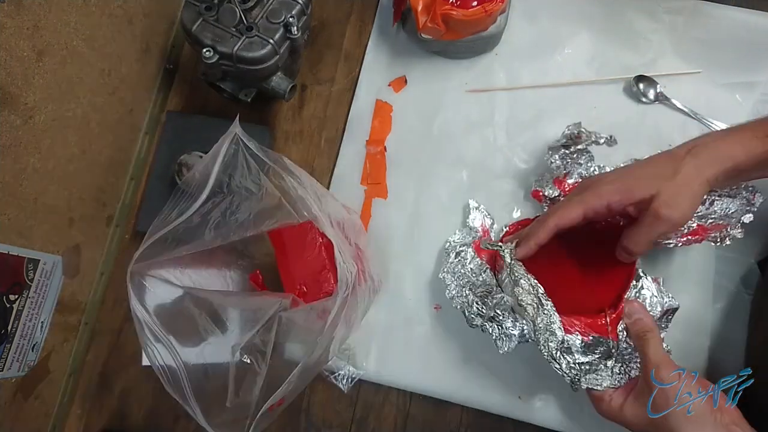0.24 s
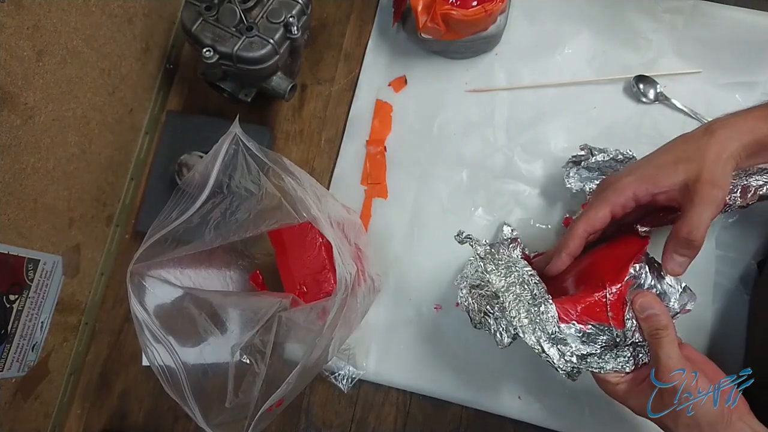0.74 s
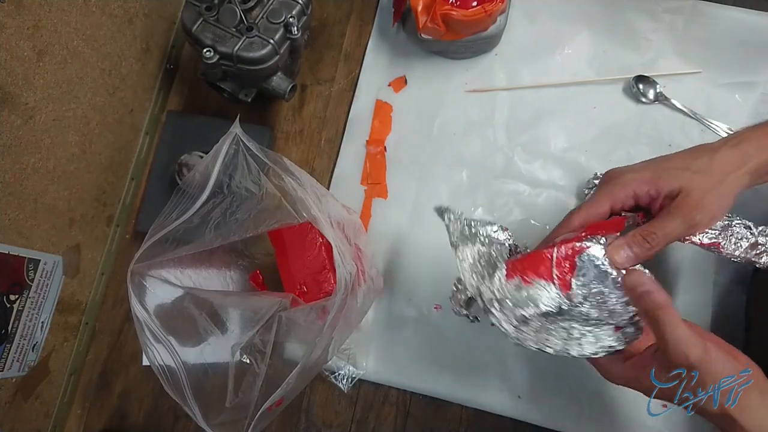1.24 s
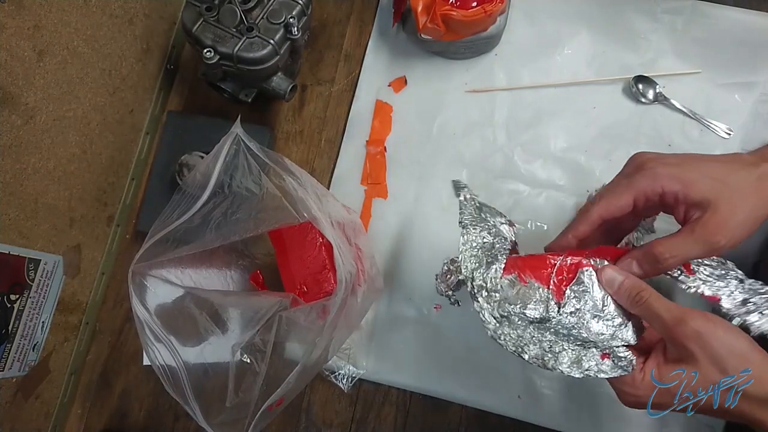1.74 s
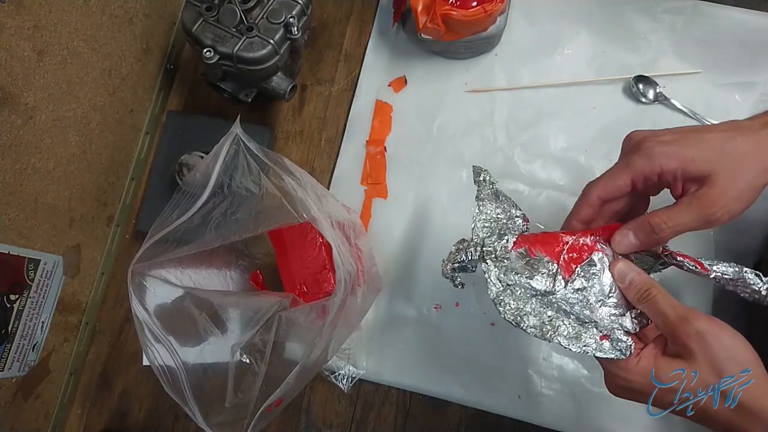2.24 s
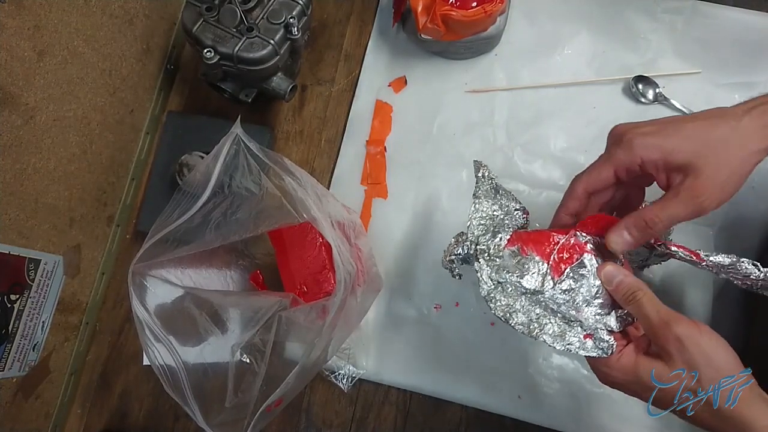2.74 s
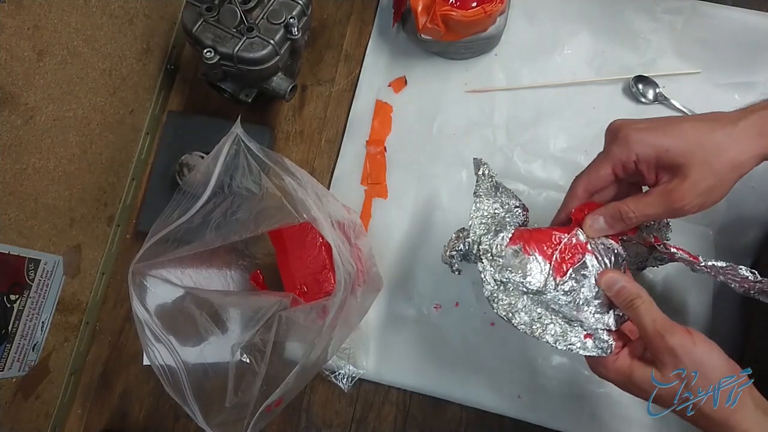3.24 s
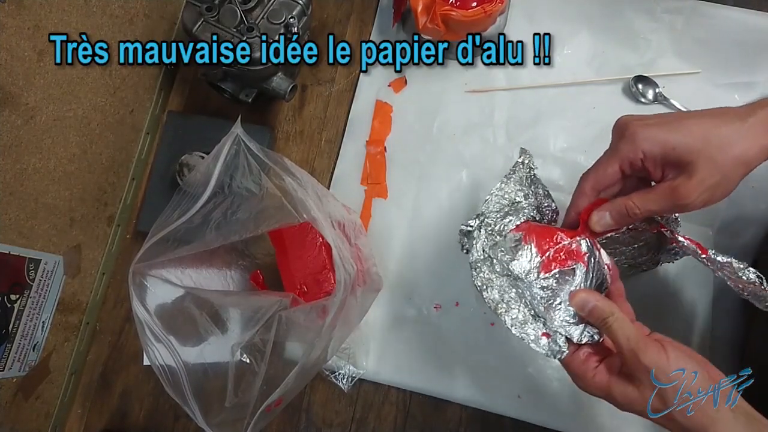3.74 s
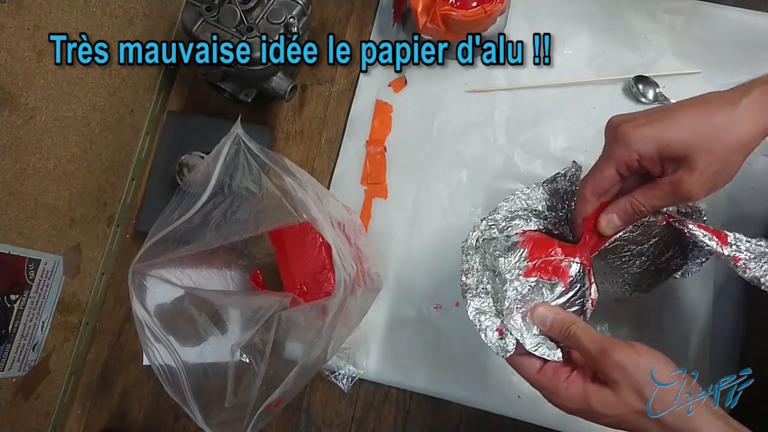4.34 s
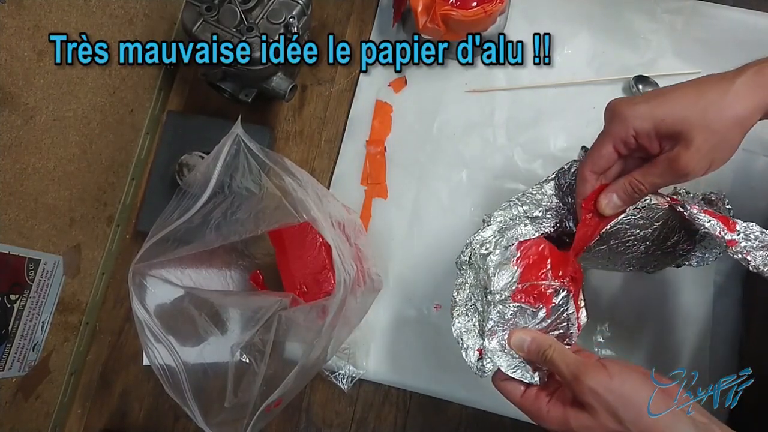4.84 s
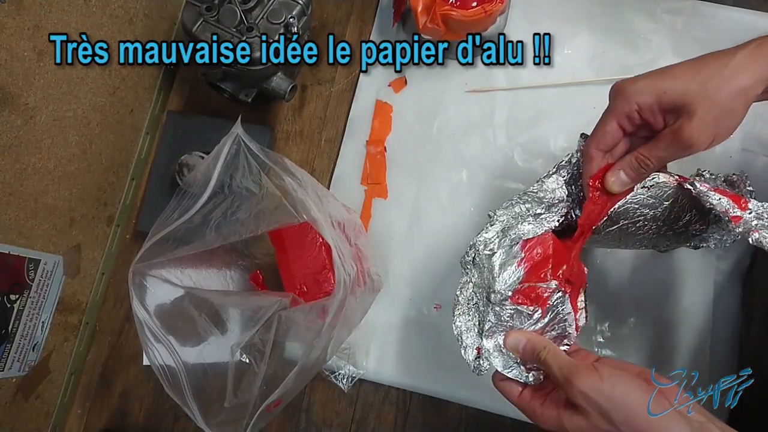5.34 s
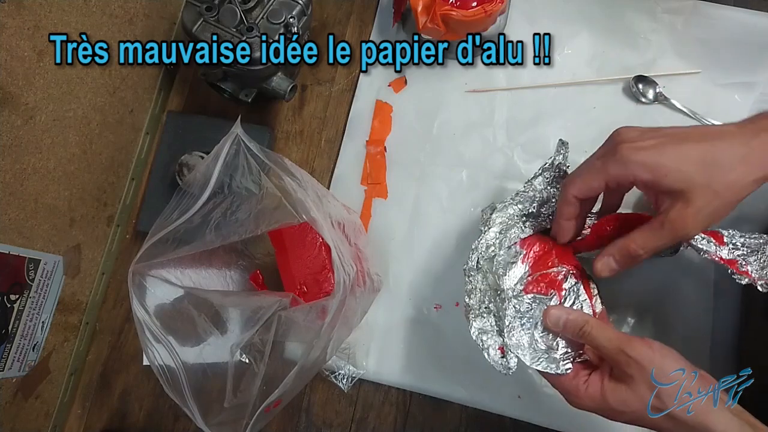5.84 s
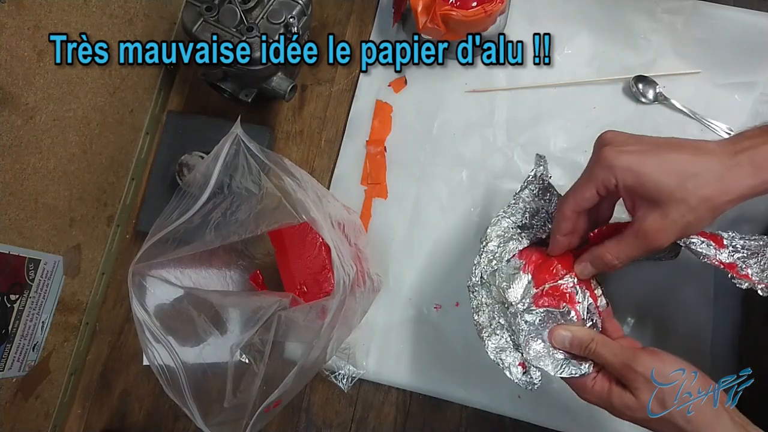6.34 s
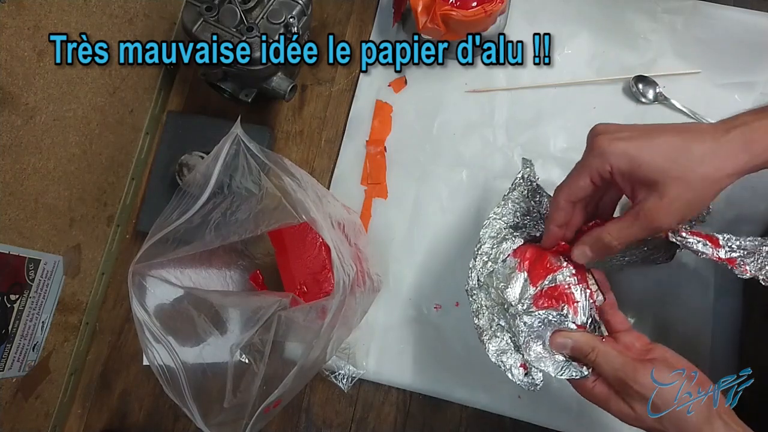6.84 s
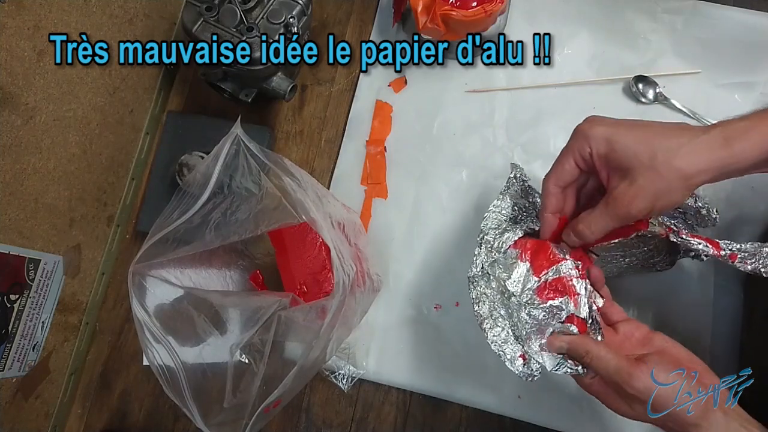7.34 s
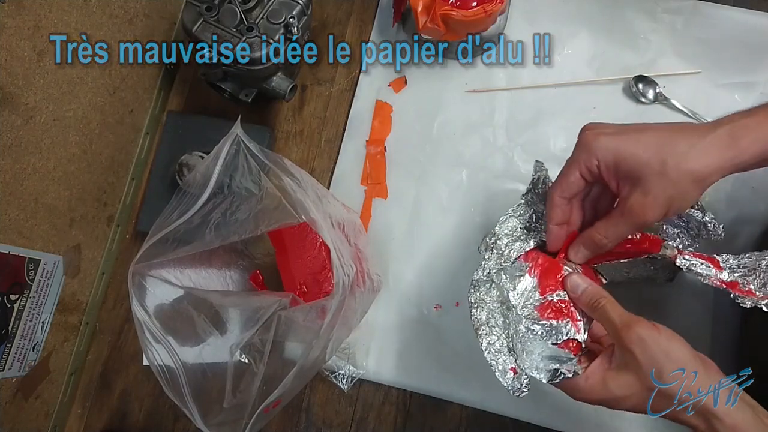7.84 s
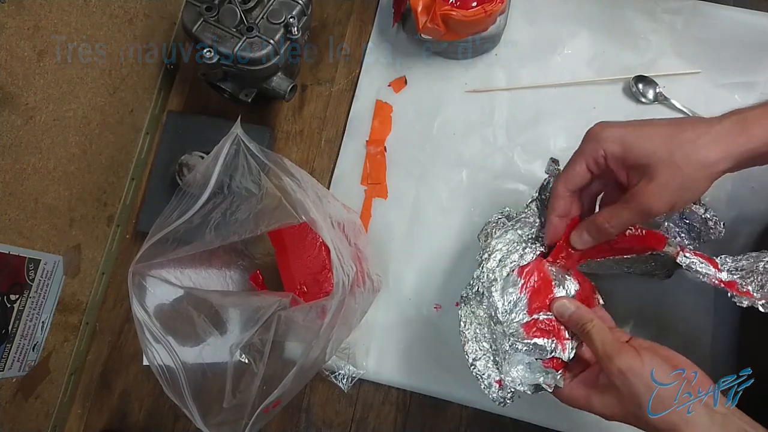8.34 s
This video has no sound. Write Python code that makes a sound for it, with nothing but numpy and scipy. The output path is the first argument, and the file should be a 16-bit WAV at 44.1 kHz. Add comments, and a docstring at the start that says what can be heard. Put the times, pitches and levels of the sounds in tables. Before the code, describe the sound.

Hands squeeze and pull crumpled aluminium foil from a rubbery mould, making irregular rustles and sharp snaps above a low room drone.

```python
"""Hands peel crumpled aluminium foil off a rubbery mould over a workbench, near a mono microphone.
A small workshop drones low under faint hiss; one soft bump comes first. From 0.2 s the held foil
rustles, each squeeze or pull a swell of tiny buckling facets, and single creases snap in between.
From 1.3 s fingers now and then knock the hollow shell; at 4.4 s the rubber pulls free in tiny slips.
The crinkling goes on to the end, answered briefly by the room."""
import sys
import numpy as np
from scipy import signal
from scipy.fft import rfft, irfft
from scipy.io import wavfile
from scipy.ndimage import uniform_filter1d

SR = 44100
rng = np.random.default_rng(int(sys.argv[2]) if len(sys.argv) > 2 else 0)


def to_wav(s):
    """Save 16-bit WAV."""
    ch = np.atleast_2d(s).T  # columns
    pcm = np.round(np.clip(ch, -1, 1) * 32767)  # PCM
    wavfile.write(sys.argv[1], SR, pcm.astype(np.int16))


N = 378378

PANEL_HZ = 2860  # broad panels ring below, small facets above
USUAL_DB, USUAL_DULL_DB = -38.5, -12  # ordinary stroke; its panels re its facets
# light grip on the foil: t/s, level/dB
GRIP = [(0.2, -54.5), (1.65, -50.5), (2.15, -48), (2.25, -58.5), (2.63, -65), (2.8, -47), (3.02, -55.5),
        (3.2, -49.5), (4.3, -45.5), (4.8, -48), (4.95, -64), (5.41, -70), (5.55, -50.5), (6.65, -47.5),
        (7.24, -56), (7.82, -46.5), (8.01, -56.5), (8.4, -51)]


def amp(db):
    return 10 ** (np.asarray(db) / 20)


def unit_rms(x):
    return x / np.sqrt(np.mean(x ** 2) + 1e-20)


def at_hz(points, hz):
    f, value = np.transpose(points)
    return np.interp(np.log(hz + 1), np.log(f + 1), value)


def hump(hz, centre_hz, width_hz):
    return np.exp(-2 * ((hz - centre_hz) / width_hz) ** 2)


def smooth(x, first, second):
    return uniform_filter1d(uniform_filter1d(x, first), second)


def add(mix, start_s, sound):
    part = mix[max(round(start_s * SR), 0):][:len(sound)]
    part += sound[:len(part)]


def tinted(x, db_at, size=2048):
    """Causal filter of gain db_at(hz); attacks stay sharp."""
    log_gain = np.log(amp(np.maximum(db_at(abs(np.fft.fftfreq(size, 1 / SR))), -100)))
    taps = np.fft.ifft(np.exp(np.conj(signal.hilbert(log_gain)))).real
    return signal.oaconvolve(x, taps[:size // 2])[:len(x)]


def split(x):
    """Dull and bright band."""
    return [signal.sosfilt(signal.butter(3, PANEL_HZ, kind, fs=SR, output="sos"), x)
            for kind in ("low", "high")]


def room_tone(drone_db=-50, hiss_db=-61):
    """Workshop drone whose deep part comes and goes, plus faint steady hiss."""
    # noise spectra: f/Hz, relative density/dB
    drone_shape = [(13, -50.5), (22, -31), (59, 3), (123, 0), (187, -9.5), (254, -27), (280, -46),
                   (360, -74), (620, -120)]
    hiss_shape = [(150, -35), (300, -5), (800, -9), (2000, -15), (16000, -18)]
    # deep rumble: t/s, gain/dB
    swell = [(0.8, -1.5), (3, -2), (3.9, 3.5), (4.6, -5), (5.2, 5), (5.798, -4.5), (8.5, -7.5)]
    hz = np.fft.rfftfreq(N, 1 / SR)
    drone, hiss = (unit_rms(irfft(rfft(rng.standard_normal(N)) * amp(at_hz(shape, hz)), N))
                   for shape in (drone_shape, hiss_shape))
    deep = irfft(rfft(drone) * hump(hz, centre_hz=70, width_hz=34), N)
    swell_db = np.interp(np.arange(N) / SR, *np.transpose(swell))
    return amp(drone_db) * (drone + (amp(swell_db) - 1) * deep) + amp(hiss_db) * hiss


def knock(modes):
    """Soft blow on a few quickly damped modes."""
    t = np.arange(SR // 3) / SR
    return -sum(amp(db - 60 * t / t60_s) * np.sin(2 * np.pi * hz * t) * (1 - np.exp(-2 * hz * t))
                for hz, db, t60_s in modes)


def bench_bump(start_s=0.063):
    """Something soft knocks the bench, with a faint clink."""
    # f/Hz, level/dB, t60/s
    modes = [(105, -22, 0.083), (171.4, -38, 0.07), (288.3, -38.5, .05), (385, -40, 0.053),
             (2600, -54, 0.05), (3570, -51, 0.045)]
    out = np.zeros(N)
    add(out, start_s, knock(modes))
    return out


def crinkle_spectrum_db(hz):
    """Foil crinkle spectrum with steady peaks and dips, including the microphone's bright colour."""
    # f/Hz, relative density/dB
    spectrum = [(150, -44.5), (250, -23), (913, -12.5), (1160, -14), (5040, 0.5), (5690, -0.5),
                (8180, -5.5), (13000, -1), (15500, -12)]
    # foil shell and microphone: f/Hz, width/Hz, gain/dB
    colour = [(357, 94, 4), (597, 27, 3.5), (987, 280, 4), (1390, 310, 1.5), (1920, 140, 0),
              (3887, 850, -1.5), (4976, 595, -8), (5630, 860, 3), (11200, 1100, 1), (14350, 1500, 5)]
    return at_hz(spectrum, hz) + sum(db * hump(hz, f, width_hz) for f, width_hz, db in colour)


def facet(tick, ring, fade_s, cycles, count=3, size=700):
    """One buckle: a tick, a brief scatter through the wrinkles, a few modes."""
    t = np.arange(size) / SR
    scatter = rng.standard_normal(size) * np.exp(-t / fade_s)
    hz = np.exp(rng.uniform(np.log(700), np.log(15000), (count, 1)))
    life_s = cycles / np.sqrt(hz * PANEL_HZ)  # larger facets ring longer
    modes = (np.sqrt(hz / life_s) * np.sin(2 * np.pi * hz * t) * np.exp(-t / life_s)).sum(0)
    buckle = unit_rms(scatter) + ring * unit_rms(modes) + tick * unit_rms(1. * (t == 0))
    return unit_rms(buckle) / np.sqrt(size)


def crackle(samples, per_s, spread_db, clump_db=2, size=600, count=3):
    """Facets buckle in clumps; each flips for some 40 ms, then its neighbours take over."""
    clumps = unit_rms(smooth(rng.standard_normal(samples), 300, 200))
    strength = amp(spread_db * np.minimum(rng.exponential(1, samples), 4) + clump_db * clumps)
    clicks = strength * rng.choice([-1, 1], samples) * (rng.random(samples) < per_s / SR)
    owner = np.arange(samples) // size - rng.integers(0, count, samples)
    out = np.zeros(samples)
    for k in np.unique(owner):
        span = slice(max(k, 0) * size, (k + count) * size)
        buckle = facet(tick=0.85, ring=0.7, fade_s=0.0016, cycles=16.4)
        add(out, span.start / SR, signal.fftconvolve(clicks[span] * (owner[span] == k), buckle))
    return out


def crinkle(force_db, bright_db, dull_db, air_hz, ring_hz, ring_db=4, air_db=6):
    """Bent foil: a light touch gives few, uneven ticks, a hard one a dense sizzle."""
    effort_db = bright_db + force_db - USUAL_DB
    grains = crackle(len(effort_db), per_s=2600 * amp(.8 * np.maximum(effort_db, -20)),
                     spread_db=np.clip(2.5 - 0.11 * effort_db, 0, 6))
    tilt_db_per_oct = 0.56 * (bright_db - dull_db + USUAL_DULL_DB)  # tight crumples sound thinner
    grains = tinted(grains, lambda hz: crinkle_spectrum_db(hz)
                    + tilt_db_per_oct * np.log2(np.clip(hz / PANEL_HZ, .5, 2))
                    + ring_db * hump(hz, ring_hz, 0.12 * ring_hz)
                    + air_db * hump(hz, air_hz, width_hz=130))
    levels_db = dull_db + 0.78 * force_db, bright_db + force_db  # panels follow the force less
    out = 0
    for band, db in zip(split(grains), levels_db):
        power = smooth(band ** 2, 1800, 1100)  # concurrent buckles share the fingers' energy
        out = out + amp(db) * band / np.sqrt(abs(power) + 1e-3 * np.mean(band ** 2) + 1e-20)
    return out


def handling():
    """Held foil never quite rests: crinkle under a light grip."""
    times_s, db = np.transpose(GRIP)
    force_db = np.interp(np.arange(times_s[0], N / SR, 1 / SR), times_s, db) - USUAL_DB
    rustle = crinkle(force_db, USUAL_DB, USUAL_DB - 11.5, air_hz=800, ring_hz=8500, ring_db=2)
    out = np.zeros(N)
    add(out, times_s[0], rustle)
    return out


def squeezes(attack_s=.018, release_db_per_s=416, settle_db=-16.5, settle_db_per_s=110, catch_db=0.82):
    """Each stroke bites, grows or eases, lets go and leaves the foil settling."""
    # t/s, length/s, facet level/dB, panel level/dB, growth/dB, ring of the stretched patch/Hz
    strokes = [(0.204, 0.18, -34.5, -45, -3, 9700), (0.408, 0.15, -39, -46.5, 2, 1970),
               (0.568, 0.18, -39, -45.5, 2, 1800), (0.777, 0.038, -40, -49.5, 0, 5660),
               (0.897, 0.25, -38.5, -49.5, 4.5, 2950), (1.145, 0.18, -36, -46.5, 0, 2960),
               (1.406, 0.084, -38, -48, 9, 6960), (1.332, 0.037, -30.5, -45, 3, 11600),
               (1.543, 0.034, -27, -43, 0, 3970), (1.671, 0.22, -35.5, -51, 0.5, 4830),
               (1.947, 0.11, -37.5, -57, 4, 8900), (2.311, 0.036, -45.5, -58, -5, 3340),
               (2.674, 0.076, -41, -56.5, 6.5, 8600), (2.775, 0.015, -30.5, -44, -1, 6260),
               (2.872, 0.034, -35, -50, 0, 5440), (3.069, 0.061, -43, -53, 2.5, 11200),
               (3.228, 0.13, -42, -48, 6.5, 6750), (3.475, 0.26, -37, -46, 5, 4770),
               (3.734, 0.21, -32, -48.5, -1.5, 5000), (4.067, 0.078, -34.5, -43, -5, 2500),
               (4.777, 0.037, -40.5, -54, -3, 4570), (5.118, 0.077, -49, -55.5, -5.5, 10600),
               (5.519, 0.094, -31, -45, 2.5, 12700), (5.64, 0.049, -30.5, -46, -1, 7200),
               (5.784, 0.028, -40, -53, 1, 5360), (6.042, 0.076, -36.5, -49.5, 1, 4160),
               (6.149, 0.052, -39.5, -52.5, -0.5, 3200), (6.306, 0.069, -37, -51, 3, 4170),
               (6.446, 0.04, -31.5, -41.5, -1, 4240), (6.525, 0.063, -35.5, -46, -1.5, 2970),
               (6.654, 0.062, -40, -50, -1, 5400), (6.8, 0.068, -36, -49.5, -1, 3950),
               (6.938, 0.17, -34, -43.5, 1, 3240), (7.321, 0.12, -37.5, -45.5, 11.5, 2600),
               (7.471, 0.21, -38, -48.5, -1.5, 10300), (7.657, 0.11, -32.5, -52.5, 5.5, 10500),
               (8.385, 0.27, -42, -52, 0, 3700)]
    # air resonance in the foil shell: t/s, f/Hz
    hollow = [(0.3, 580), (0.5, 695), (1.2, 530), (3.1, 860), (4.3, 630)]
    out = np.zeros(N)
    for start_s, length_s, bright_db, dull_db, growth_db, ring_hz in strokes:
        t = np.arange(1, (length_s + .2) * SR) / SR
        after_s = np.maximum(t - length_s, 0)
        force_db = 20 * np.log10(np.minimum(t / attack_s, 1))
        force_db += growth_db * (np.minimum(t / length_s, 1) - .5)
        force_db += np.maximum(-release_db_per_s * after_s, settle_db - settle_db_per_s * after_s)
        wander = unit_rms(smooth(rng.standard_normal(len(t) + SR // 2), 1300, 500))
        force_db += catch_db * wander[:len(t)]  # the foil resists and gives
        air_hz = np.interp(start_s, *np.transpose(hollow))
        add(out, start_s, crinkle(force_db, bright_db, dull_db, air_hz, ring_hz))
    return out


def crease(crack_db, pop_db, run_s, ring_db=6, bare_s=.0015, size=2400):
    """A tight crease is a bare tick; a long one gathers pace, runs on and rings the panel beside it."""
    pop = facet(tick=.3, ring=.35, fade_s=run_s, cycles=7, count=8, size=size)
    rise_samples = max(SR * (run_s - bare_s) / 2, 1)
    pop *= np.minimum(np.arange(1, size + 1) / rise_samples, 1)
    pop = tinted(pop, lambda hz: crinkle_spectrum_db(hz) + ring_db * hump(hz, 1950, width_hz=550))
    dull, bright = (band / np.sqrt(np.mean(band[:132] ** 2)) for band in split(pop))  # RMS of first 3 ms
    return amp(crack_db) * bright + amp(pop_db) * dull


def snaps(ticks_per_s=12, above_grip_db=6, spread_db=1.5):
    """Big creases give way; small ones tick at random while the foil is held."""
    # t/s, relative crack level/dB, relative pop level/dB, run/s
    creases = [(0.216, -27, -47, 0.0021), (0.912, -34, -42, 0.0024), (1.2, -28.5, -38, 0.0033),
               (1.271, -26.5, -31.5, 0.0046), (1.401, -24, -34.5, .001), (1.533, -31, -37, 0.0071),
               (1.658, -35.5, -47, .002), (1.731, -26, -44, 0.0049), (2.381, -36, -60, 0.0014),
               (2.503, -28, -47.5, 0.0032), (2.837, -27.5, -55, 0.0034), (3.238, -36, -60, .003),
               (3.327, -30.5, -53, 0.0039), (3.478, -28.5, -42, 0.0047), (3.553, -36, -38, 0.0036),
               (3.818, -30, -31.5, 0.0023), (4.074, -32.5, -46, 0.0046), (4.141, -26.5, -58, .001),
               (4.589, -24, -47, 0.0019), (4.729, -30.5, -60, 0.0023), (4.797, -34, -56, .002),
               (4.813, -36, -41.5, 0.0042), (4.938, -34, -43, .0015), (4.971, -57, -48.5, .003),
               (5.031, -35.5, -54, 0.0022), (5.155, -43, -56, 0.0027), (5.204, -34.5, -41, 0.0033),
               (5.274, -49, -53, .004), (5.356, -51, -54, .001), (5.444, -41.5, -46.5, 0.0035),
               (5.533, -43, -50, .004), (5.916, -44, -51, .0025), (5.979, -32.5, -52, 0.0068),
               (6.007, -31.5, -62, 0.0024), (6.177, -30, -59, .0025), (6.246, -32, -41, .001),
               (6.306, -31, -41, 0.003), (6.46, -22.5, -35, 0.0039), (6.51, -23.5, -25, 0.0022),
               (6.624, -33, -40, 0.0018), (6.923, -32, -41, 0.0057), (6.978, -22, -31.5, .0013),
               (7.014, -23, -28, 0.0023), (7.155, -30, -49, 0.0028), (7.308, -32.5, -44, 0.0047),
               (7.524, -28, -47, 0.0025), (7.675, -31, -38, .003), (7.821, -28.5, -61, 0.0018),
               (7.901, -33, -64, .001), (8.151, -19.5, -27, 0.0015), (8.239, -36, -64, 0.0023),
               (8.377, -40, -41, 0.0037)]
    out = np.zeros(N)
    for start_s, crack_db, pop_db, run_s in creases:
        add(out, start_s, crease(crack_db + .5, pop_db - 1, run_s))
    first_s = GRIP[0][0]
    count = int(ticks_per_s * (N / SR - first_s))
    for k, (place, chance) in enumerate(rng.random((count, 2))):
        start_s = first_s + (k + place) / ticks_per_s
        db = np.interp(start_s, *np.transpose(GRIP)) + above_grip_db
        db += spread_db * min(-np.log(1 - chance), 2)
        add(out, start_s, crease(db, db - 12, run_s=0.0028))
    return out


def shell_knocks():
    """Shifting fingers knock the hollow foil shell."""
    # t/s, level/dB
    blows = [(1.275, -41), (4.09, -40), (4.14, -47), (7.42, -49)]
    # f/Hz, relative level/dB, t60/s
    modes = [(388, -1.5, 0.046), (602, 0.5, 0.074)]
    out = np.zeros(N)
    for start_s, db in blows:
        add(out, start_s, amp(db) * knock(modes))
    return out


def peel(slips_per_s=160, ring_hz=2080, width_hz=260, ring_db=28):
    """Stretched rubber lets go in tiny slips that ring the taut foil at one pitch."""
    # t/s, level/dB
    pull = [(4.4, -52), (4.46, -54), (4.54, -66), (4.72, -55), (4.85, -66)]
    times_s, db = np.transpose(pull)
    t = np.arange(times_s[0], times_s[-1], 1 / SR)
    slips = rng.standard_normal(len(t)) * (rng.random(len(t)) < slips_per_s / SR)
    ringing = unit_rms(tinted(slips, lambda hz: ring_db * hump(hz, ring_hz, width_hz)))
    out = np.zeros(N)
    add(out, times_s[0], amp(np.interp(t, times_s, db)) * ringing)
    return out


def workshop(x, tail_db=-10, near_db=-14, count=8):
    """Adds reflections from the bench and nearby things, then a short tail."""
    # f/Hz, t60/s
    decay = [(300, 0.41), (5000, 0.29), (15000, 0.29)]
    size = SR // 2
    echoes = rng.choice([-1., 1.], size) * (rng.random(size) < .1)
    hz, t, spectra = signal.stft(echoes, SR, nperseg=256)
    tail = signal.istft(spectra * amp(-60 * t / at_hz(decay, hz)[:, None]), SR, nperseg=256)[1]
    tail[:SR // 250] = 0
    response = amp(tail_db) * tail / np.linalg.norm(tail)
    delays_s = rng.uniform(.002, .014, count)
    response[(delays_s * SR).astype(int)] += amp(near_db) * rng.choice([-1, 1], count) / np.sqrt(count)
    return x + signal.oaconvolve(x, response)[:N]


def scene():
    """Foil in the room, bump and room tone; both channels alike."""
    foil = squeezes() + handling() + snaps() + shell_knocks() + peel()
    mono = workshop(foil) + bench_bump() + room_tone()
    return np.array([mono, mono])


def record(dry):
    """Steep low-pass on the top treble."""
    edge_hz = 16080
    taps = signal.firwin(511, edge_hz, window=("kaiser", 9), fs=SR)
    return signal.oaconvolve(dry, taps[None], "same")


dry = scene()
out = record(dry)
to_wav(out)
```